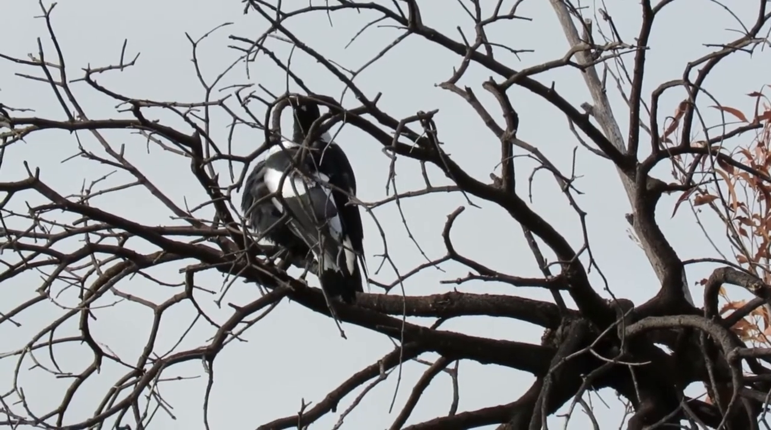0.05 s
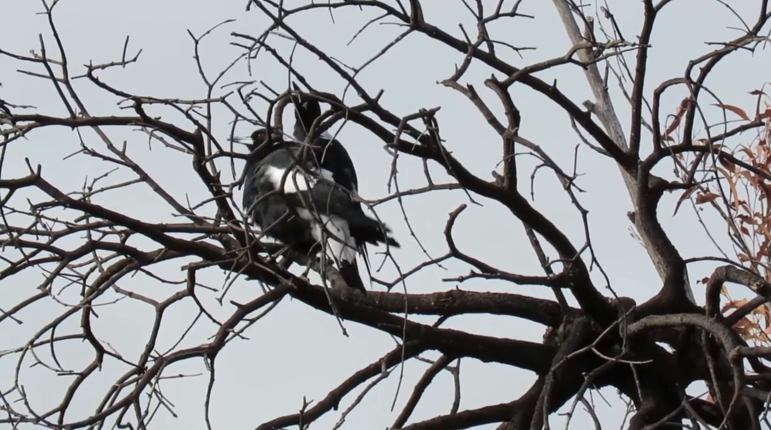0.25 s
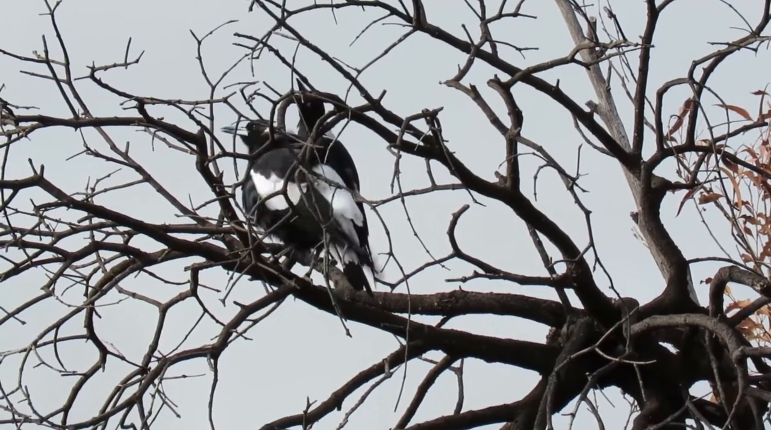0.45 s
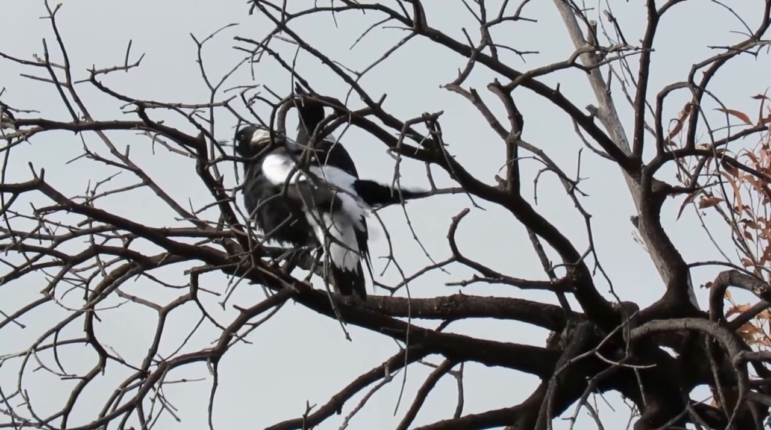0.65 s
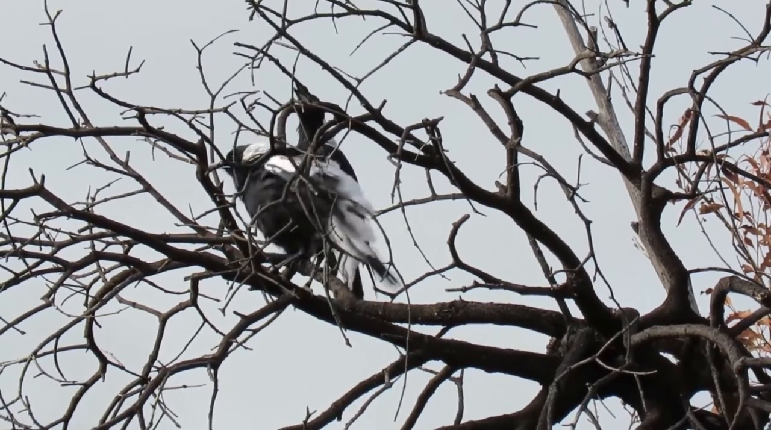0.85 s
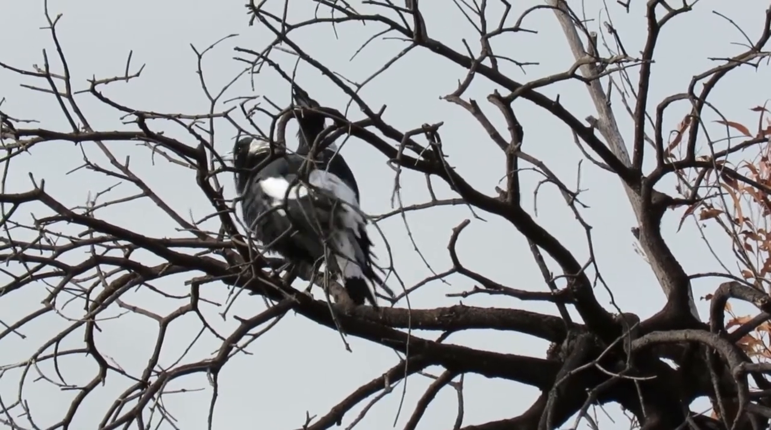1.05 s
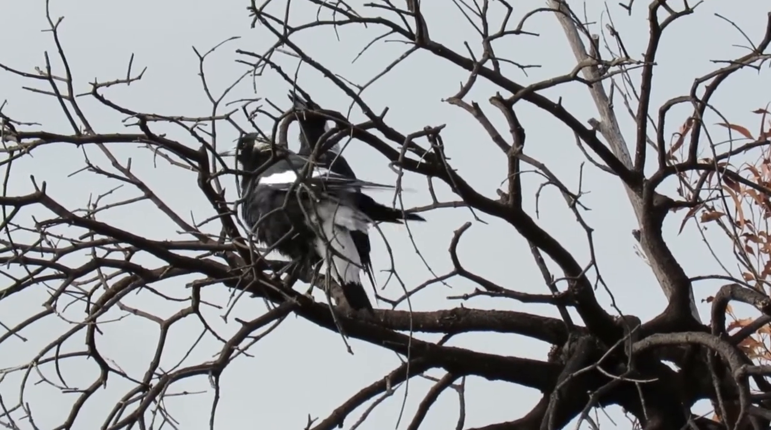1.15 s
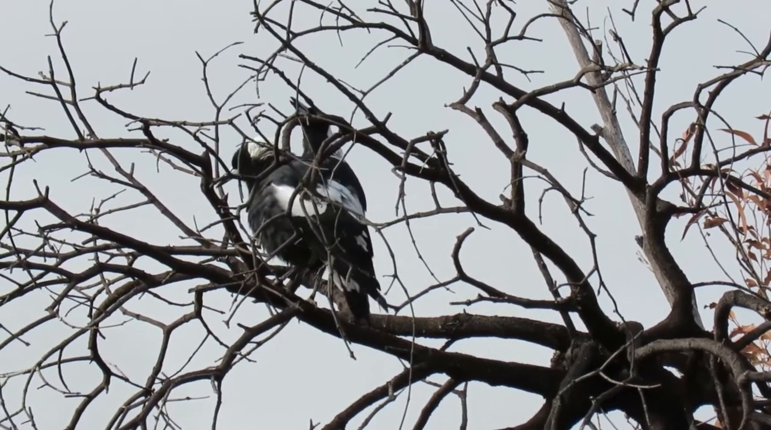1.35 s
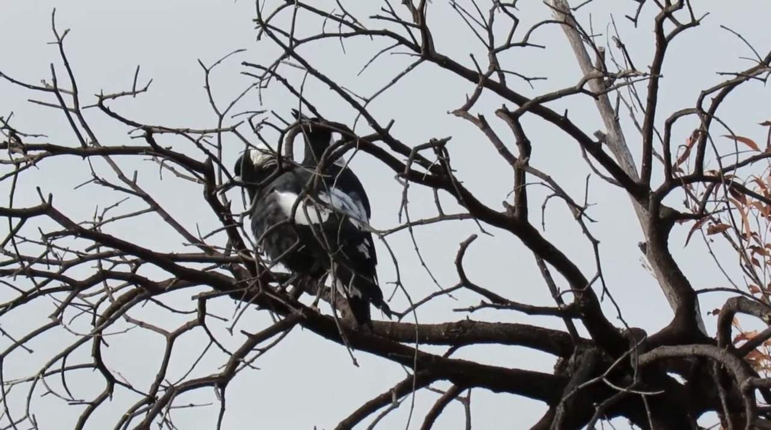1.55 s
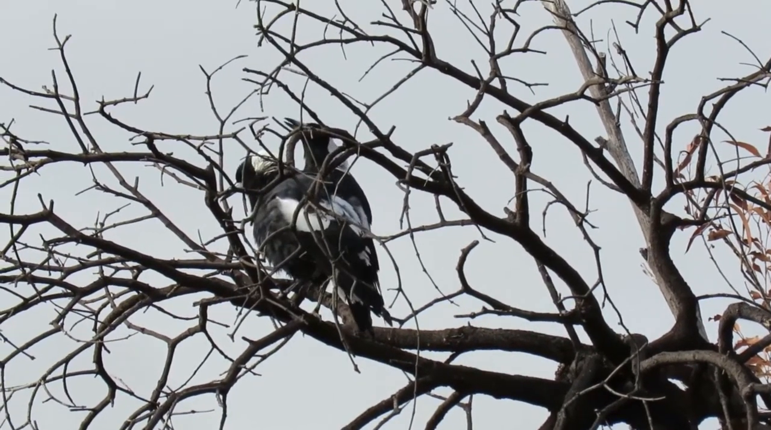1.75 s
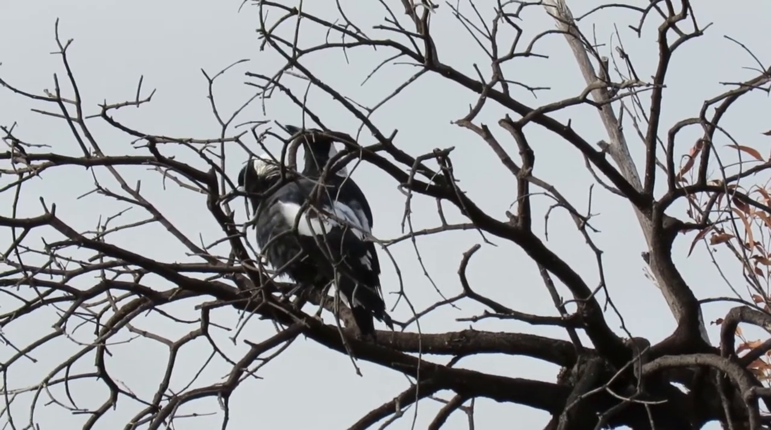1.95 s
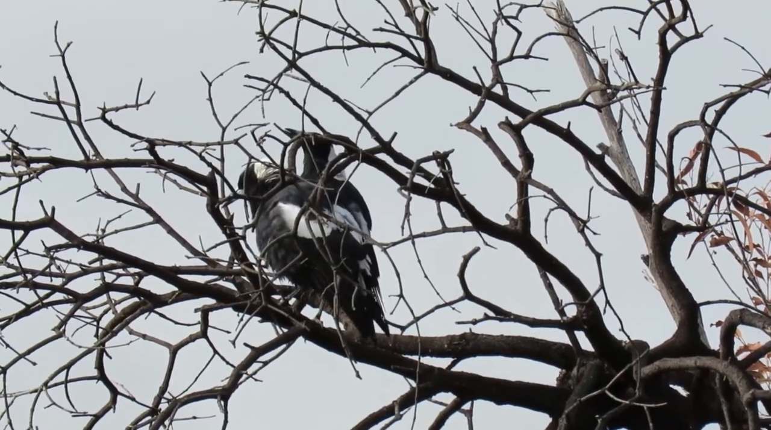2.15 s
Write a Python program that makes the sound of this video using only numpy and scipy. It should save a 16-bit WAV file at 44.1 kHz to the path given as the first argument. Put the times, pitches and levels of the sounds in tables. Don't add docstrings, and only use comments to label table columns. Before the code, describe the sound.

A magpie warbles low, gives a loud clear falling whistle, short clipped notes, a softer two-toned flute note, then a throbbing whistle and quick pips; quiet open air, distant hum, thin echo.

```python
import sys
import numpy as np
from scipy import signal
from scipy.io import wavfile

SR = 44100
rng = np.random.default_rng(int(sys.argv[2]) if len(sys.argv) > 2 else 0)


def invert_db(x):
    u = np.asarray(x, float) / 20
    return 10 ** u


def wav_record(signal):
    frames = np.transpose(np.atleast_2d(signal))
    bounded = np.clip(frames, -1, 1)
    quanta = np.round(bounded * 32767).astype(np.int16)
    wavfile.write(sys.argv[1], SR, quanta)


N = 97020
T = np.arange(N) / SR


def rms_one(x):
    return x / np.sqrt(np.mean(x ** 2) + 1e-20)


def bandpass(x, order, low_hz, high_hz):
    return signal.sosfilt(signal.butter(order, [low_hz, high_hz], "band", fs=SR, output="sos"), x)


def drift(rate_hz):
    r = np.exp(-2 * np.pi * rate_hz / SR)
    settle = SR // 4
    noise = rng.standard_normal(N + settle)
    return rms_one(signal.lfilter([1], [1, -2 * r, r * r], noise)[settle:])


def curve(rows):
    s, *columns = np.transpose(rows)
    gate = np.clip(np.minimum(T - s[0], s[-1] - T) * 300 + 1, 0, 1)
    return [gate] + [np.interp(T, s, c) for c in columns]


def swell(start, length):
    attack_s, release_s = min(.016, length / 2), min(.022, length / 2)
    up = (T - start) / attack_s
    down = (start + length - T) / release_s
    return np.sin(np.pi / 2 * np.clip(np.minimum(up, down + .5), 0, 1)) ** 2


def arch(start, length):
    return np.sin(np.pi * np.clip((T - start) / length, 0, 1)) ** 0.59


def glide(start, length, first_hz, last_hz):
    return np.interp(T, [start, start + length], [first_hz, last_hz])


def phase(hz):
    return 2 * np.pi * np.cumsum(hz) / SR


def tone(hz, db):
    level = invert_db(db + .8 * drift(30))
    return np.sqrt(2) * level * np.sin(phase(hz + 5.5 * drift(30)))


# pitch_hz [Hz], density_db [dB per Hz]
HUM = [(18, -44), (30, -12.5), (281, -4), (495, -9), (709, -10.5), (786, -1.5), (2140, -18.5), (7550, -30),
       (14000, -55)]
# pitch_hz [Hz], density_db [dB per Hz]
WIDE = [(18, -60), (30, -38.5), (181, -3.5), (373, -2.5), (4520, -28), (5690, -30.5), (7950, -36.5),
        (12000, -46.5), (14000, -60.5)]


def hum(spectrum, patchy_db):
    out = 0
    edges = 28 * 2 ** np.arange(0, 9.3, .5)
    white = rng.standard_normal((2, N))
    hz, db = np.transpose(spectrum)
    for k, (low, high) in enumerate(zip(edges, edges[1:])):
        band = bandpass(white[k % 2], 2, low, high)
        band_db = np.interp(np.log(low * high) / 2, np.log(hz), db)
        out = out + band * invert_db(band_db + patchy_db * drift(2.9))
    return rms_one(out)


def distant_air():
    common = invert_db(-54) * hum(HUM, patchy_db=.4)
    opposed = invert_db(-51) * hum(WIDE, patchy_db=.4)
    return common + opposed * [[1], [-1]]


# start_s [s], length_s [s], level_db [dB]
GUSTS = [
    (1.1, .04, -64),
    (1.165, .09, -55),
    (1.72, .2, -62),
    (.34, .06, -66),
    (0, .05, -64),
    (1.3, .06, -63),
]


def wind():
    noise = bandpass(rng.standard_normal((3, N)), 2, 35, 124)
    shape = sum(invert_db(db) * np.exp(-((T - s - d / 2) / d * 2) ** 2) for s, d, db in GUSTS)
    shared = .6 * noise[2]
    return shape * rms_one(noise[:2] + shared)


# start_s [s], length_s [s], pitch_hz [Hz], width_hz [Hz], level_db [dB]
FAR = [
    (0, 1.8, 565, 29.4, -63),
    (0, 1.3, 786.8, 30.3, -61.5),
    (1.85, .14, 399, 112, -53.5),
    (2.02, .2, 407, 62, -59.5),
    (2.116, .1, 272, 39.7, -59.5),
    (1.92, .14, 580, 70, -57),
    (1.27, .14, 570, 90, -58),
    (1.3, .12, 900, 300, -54),
]


def far_birds():
    out = 0
    for s, d, hz, width_hz, db in FAR:
        band = bandpass(rng.standard_normal(N), 2, hz - width_hz / 2, hz + width_hz / 2)
        out = out + invert_db(db) * swell(s, d) * rms_one(band)
    return out


def chopped(rows, rate_hz, depth, swing_hz):
    out, uneven = 0, .5 * drift(28)
    for s, d, first_hz, last_hz, db in rows:
        beat = 2 * np.pi * rate_hz * (T - s) + uneven
        pulse = (1 - depth * np.cos(beat)) * invert_db(1.7 * drift(60))
        hz = glide(s, d, first_hz, last_hz) + swing_hz * np.sin(beat)
        out = out + arch(s, d) * pulse * tone(hz, db)
    return out


# start_s [s], length_s [s], first_hz [Hz], last_hz [Hz], level_db [dB]
WARBLE = [
    (.1, .04, 1350, 1345, -49),
    (.0, .04, 760, 740, -50),
    (.425, .14, 1150, 1120, -50),
    (1.43, .05, 790, 700, -51),
    (2.175, .04, 720, 700, -49),
]


def warble():
    return chopped(WARBLE, rate_hz=66, depth=.75, swing_hz=50)


# start_s [s], length_s [s], first_hz [Hz], last_hz [Hz], level_db [dB]
CLEAR = [(.257, .06, 868, 860, -43), (.664, .022, 1000, 1000, -49), (.706, .034, 1270, 1170, -39),
         (.714, .034, 1640, 1520, -34), (.82, .15, 875, 830, -47), (1.155, .04, 1700, 1600, -51),
         (1.878, .022, 1200, 1110, -46), (1.898, .024, 1310, 1300, -40), (1.924, .017, 1140, 1090, -48),
         (1.946, .046, 735, 724, -35.5), (.058, .022, 1780, 1760, -56), (.122, .034, 1740, 1720, -54),
         (1.375, .025, 980, 960, -52), (1.94, .09, 722, 735, -48), (.81, .04, 1100, 1110, -49),
         (.85, .1, 750, 725, -55), (1.915, .022, 1570, 1570, -59), (.64, .035, 705, 690, -53),
         (.252, .014, 3650, 3750, -60), (.55, .07, 820, 775, -50), (.09, .115, 1358, 1345, -50)]


def clear_notes():
    out = 0
    for s, d, first_hz, last_hz, db in CLEAR:
        out = out + swell(s, d) * tone(glide(s, d, first_hz, last_hz), db)
    return invert_db(1.5 * drift(100)) * out


def echo(x):
    decay_s, gap_s = 1.3, .07
    tail = rng.standard_normal((2, N)) * invert_db(-60 * T / decay_s) * (T > gap_s)
    lowpass = signal.butter(1, 6000, fs=SR, output="sos")
    tail = signal.sosfilt(lowpass, tail + 1.2 * tail[::-1])
    tail = tail / np.sqrt(np.sum(tail ** 2) / 2)
    return invert_db(-23) * signal.fftconvolve(x[None], tail, axes=1)[:, :N]


# start_s [s], length_s [s], pitch_hz [Hz], level_db [dB]
PIPS = [(.115, .012, 1350, -45), (.694, .012, 1535, -37), (1.503, .014, 725, -41), (1.517, .012, 720, -38),
        (1.529, .015, 700, -36), (1.548, .009, 700, -46), (1.844, .008, 860, -46),
        (1.854, .009, 800, -37.5), (1.866, .007, 650, -41), (2.038, .009, 745, -46),
        (2.052, .009, 740, -46), (2.069, .009, 720, -45), (2.083, .01, 700, -44), (2.096, .01, 650, -50),
        (2.107, .012, 1010, -47), (2.118, .009, 930, -39), (2.129, .011, 985, -39),
        (2.139, .011, 1020, -35.5), (2.152, .008, 910, -39.5), (2.16, .018, 1000, -46)]


def pips():
    out = np.zeros(N)
    for s, d, hz, db in PIPS:
        x = np.clip((T - s) / d, 0, 1)
        rise_fall = np.minimum(x / .4, (1 - x) * 2)
        shape = np.sin(np.pi / 2 * np.minimum(rise_fall, 1))
        out += np.sqrt(2) * invert_db(db) * shape * np.sin(2 * np.pi * hz * (T - s))
    return out


# start_s [s], length_s [s], pitch_hz [Hz], scatter_hz [Hz], level_db [dB]
RASP = [
    (.135, .13, 1500, 55, -55),
    (.41, .13, 1430, 45, -59),
    (.706, .042, 900, 22, -54),
]
HOARSE = [
    (5.5, -2, -9, -12.5, -15.5, -18, -23, -22),
    (-14.5, -6, -14.5, -5, -16, -12, -17, -21),
    (2, 3.5, 1, 4, -6, -3, 0, -2),
]


def rasp():
    out = 0
    for (s, d, hz, scatter_hz, db), colour in zip(RASP, HOARSE):
        turn = phase(glide(s, d, 1.05 * hz, .96 * hz) + scatter_hz * drift(300))
        stack = sum(invert_db(c + 3.8 * drift(220)) * np.sin((k + 2) * turn) for k, c in enumerate(colour))
        pulse = 1 - .45 * np.cos(2 * np.pi * 82 * (T - s) + 2.0 * drift(25))
        out = out + invert_db(db) * arch(s, d) * pulse * rms_one(stack)
    return out


# start_s [s], length_s [s], low_hz [Hz], high_hz [Hz], level_db [dB]
RUSH = [
    (.17, .11, 2600, 8000, -65),
    (.2, .085, 8000, 14400, -74),
    (.27, .15, 10000, 12200, -70),
    (.41, .13, 4000, 8000, -64),
    (.41, .15, 9500, 12500, -76),
    (.708, .042, 2500, 8000, -61),
    (.706, .07, 8000, 12000, -69),
]


def rush():
    out, white = 0, rng.standard_normal(N)
    for s, d, low_hz, high_hz, db in RUSH:
        out = out + invert_db(db) * arch(s, d) * rms_one(bandpass(white, 3, low_hz, high_hz))
    return out


# start_s [s], length_s [s], first_hz [Hz], last_hz [Hz], level_db [dB]
TRILL = [
    (.174, .088, 1560, 1500, -37.5),
    (.325, .04, 1050, 950, -44),
    (2.105, .075, 900, 1060, -52),
    (1.965, .04, 860, 930, -52),
    (1.843, .038, 800, 600, -53),
]


def trill():
    return chopped(TRILL, rate_hz=86, depth=.5, swing_hz=55)


# centre_hz [Hz], width_hz [Hz], level_db [dB re fundamental]
THROAT = [(3110, 150, -39.5), (3900, 200, -33), (3554, 220, -29), (4690, 520, -18.5), (5810, 350, -28),
          (6350, 200, -31), (7115, 450, -24), (8060, 500, -33), (9500, 500, -39), (10000, 300, -40),
          (7750, 300, -33), (11700, 900, -43), (13800, 500, -49), (14700, 500, -46)]


def overtones(hz, db, count=9):
    out, turn = 0, phase(hz + 8 * drift(120))
    for k in range(2, count + 1):
        gain = 0
        for centre_hz, width_hz, level_db in THROAT:
            detuning = 2 * (k * hz - centre_hz) / width_hz
            gain = gain + invert_db(level_db) / (1 + detuning ** 4)
        out = out + gain * invert_db(3.5 * drift(45)) * np.sin(k * turn + k * k)
    return np.sqrt(2) * invert_db(db) * out


# start_s [s], pitch_hz [Hz], level_db [dB], beak_opening_db [dB]
CALL = [
    (.252, 1560, -50, -2),
    (.26, 1900, -35, -2),
    (.27, 1982, -27, 0),
    (.3, 1945, -27.5, 1),
    (.385, 1756, -26.5, -2),
    (.51, 1614, -25, -4.5),
    (.542, 1581, -22.5, -1.5),
    (.562, 1575, -24, -4),
    (.58, 1530, -52, -10),
]


def falling_call():
    gate, hz, db, open_db = curve(CALL)
    tremble_s = np.clip(T, .425, .53) - .425
    db = db + 2.3 * np.sin(2 * np.pi * 30.5 * tremble_s)
    beak = np.clip(np.minimum(T - .261, .574 - T) / .012, 0, 1)
    return gate * (tone(hz, db) + beak * overtones(hz, db + open_db))


# start_s [s], length_s [s], first_hz [Hz], last_hz [Hz], level_db [dB]
REEDY = [
    (0.734, 0.073, 1132, 1112, -37),
]
# multiple [of the pitch], level_db [dB re fundamental]
REED = [(2, -29.5), (3, -31), (4, -7), (6, -19.5), (7, -35), (10, -29)]


def reedy_notes():
    out = 0
    for s, d, first_hz, last_hz, db in REEDY:
        turn = phase(glide(s, d, first_hz, last_hz) + 4.5 * drift(80))
        reed = sum(invert_db(k_db) * np.sin(round(k) * turn) for k, k_db in REED)
        dropout = 1 - np.exp(-((T - .781) / .006) ** 2)
        delay_s = .008
        rich = arch(s + delay_s, d - delay_s) * dropout * reed
        out = out + np.sqrt(2) * invert_db(db) * (swell(s, d) * np.sin(turn) + rich)
    return out


# start_s [s], pitch_hz [Hz], level_db [dB]
FLUTE = [
    (.81, 1225, -49),
    (.86, 1263, -37),
    (.94, 1255, -32.5),
    (1.02, 1222, -37),
    (1.08, 1150, -48.5),
    (1.12, 1098, -36.5),
    (1.18, 1058, -33.5),
    (1.295, 1031, -32),
    (1.312, 1045, -46),
]
# start_s [s], pitch_hz [Hz], level_db [dB]
UPPER = [
    (.82, 1370, -55),
    (.88, 1350, -43),
    (.93, 1356, -46.5),
    (1.01, 1329, -36.5),
    (1.05, 1295, -37.5),
    (1.095, 1225, -33.5),
    (1.11, 1210, -47.5),
    (1.2, 1150, -44.5),
    (1.3, 1130, -53.5),
]


def flute():
    gate, low_hz, low_db = curve(FLUTE)
    _, high_hz, high_db = curve(UPPER)
    mix_db = (low_db + high_db) / 2 - 10.5 + 4.6 * drift(22)
    voices = tone(low_hz, low_db) + tone(high_hz, high_db)
    below = tone(2 * low_hz - high_hz, mix_db)
    above = tone(2 * high_hz - low_hz, mix_db - 9.5)
    return gate * (voices + below + above)


# start_s [s], pitch_hz [Hz], level_db [dB]
THROB = [
    (1.585, 996.7, -58),
    (1.63, 993, -42.5),
    (1.69, 989, -39.5),
    (1.74, 978, -36),
    (1.8, 986.5, -38.5),
    (1.83, 965, -37),
    (1.85, 948, -47),
    (1.875, 910, -44),
    (1.882, 930, -78),
]
# multiple [of the throb rate], level_db [dB re whistle]
THROB_SIDES = [(-3, -25), (-2, -10.5), (-1, -7.5), (1, -16.5)]


def throb():
    gate, hz, db = curve(THROB)
    out = tone(hz, db)
    for k, side_db in THROB_SIDES:
        out = out + tone(hz + round(k) * 74.35, db + side_db + 3.9 * drift(40))
    return gate * out


def scene():
    notes = warble() + clear_notes() + trill() + reedy_notes()
    birds = notes + pips() + rasp() + rush() + falling_call() + flute() + throb()
    pan_db, lag_s = .22, .00002
    left = invert_db(pan_db) * birds
    right = invert_db(-pan_db) * np.interp(T - lag_s, T, birds)
    return np.array([left, right]) + echo(birds) + far_birds() + distant_air() + wind()


def roll_off(x):
    return signal.sosfilt(signal.butter(12, 14900, fs=SR, output="sos"), x)


def record(dry):
    hiss = rng.standard_normal(N) + 0.58 * rng.standard_normal((2, N))
    wet = dry + invert_db(-79) * hiss
    mix = signal.sosfilt(signal.cheby2(12, 70, 15800, fs=SR, output="sos"), wet)
    return roll_off(mix)


dry = scene()
out = record(dry)
wav_record(out)
```